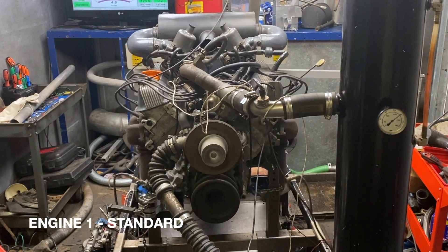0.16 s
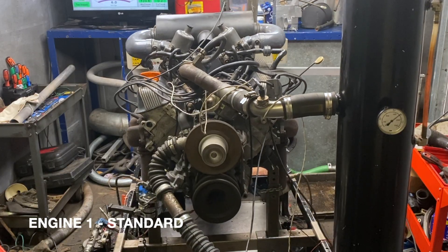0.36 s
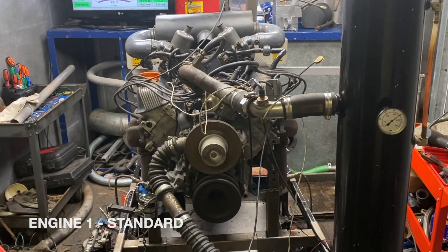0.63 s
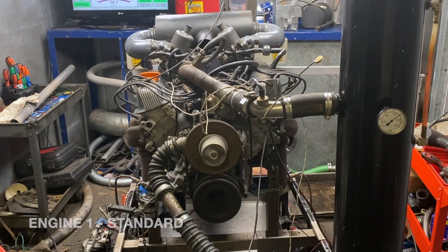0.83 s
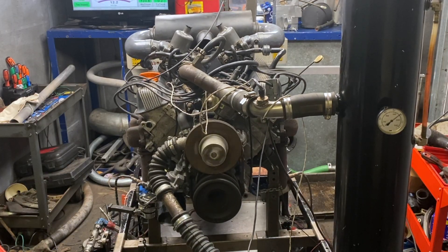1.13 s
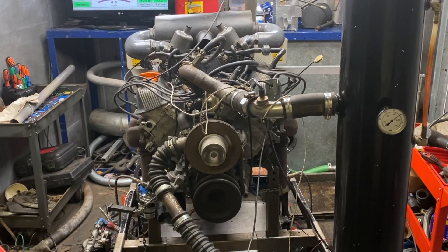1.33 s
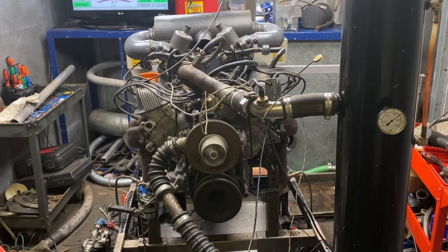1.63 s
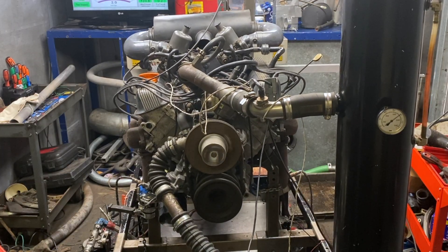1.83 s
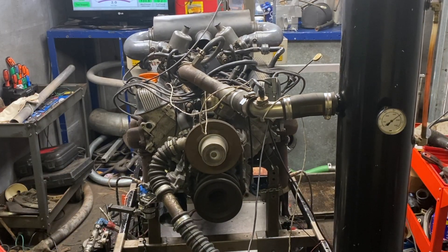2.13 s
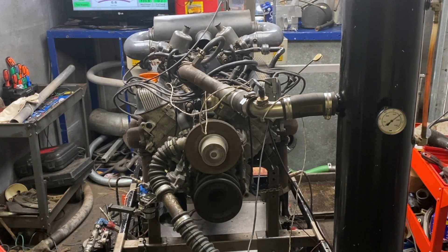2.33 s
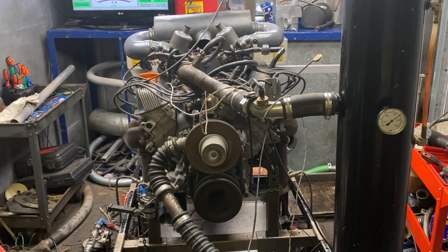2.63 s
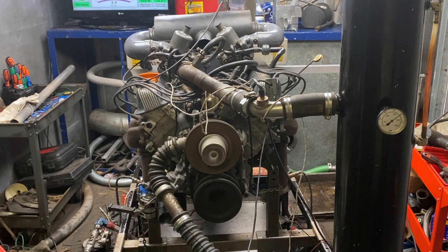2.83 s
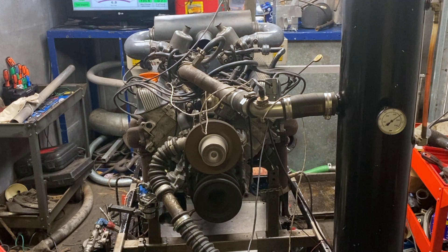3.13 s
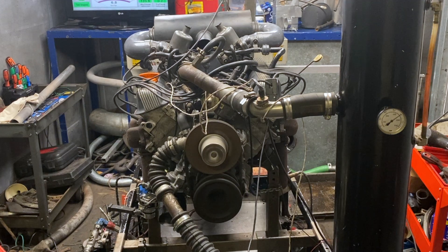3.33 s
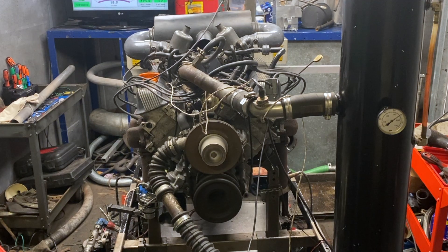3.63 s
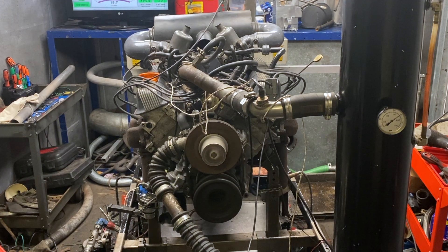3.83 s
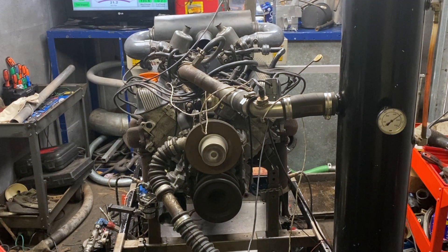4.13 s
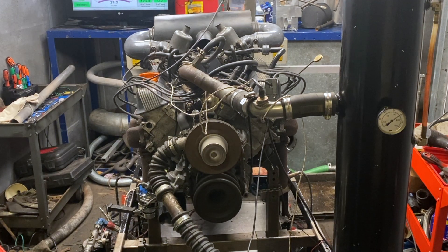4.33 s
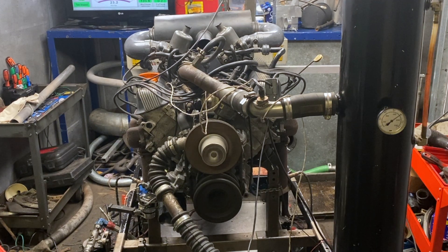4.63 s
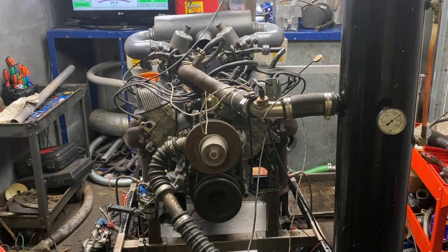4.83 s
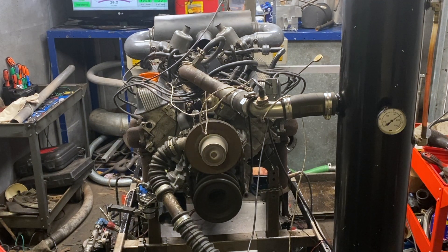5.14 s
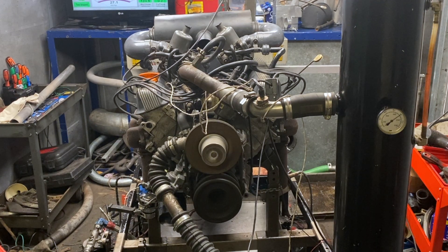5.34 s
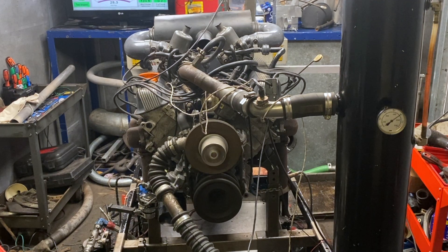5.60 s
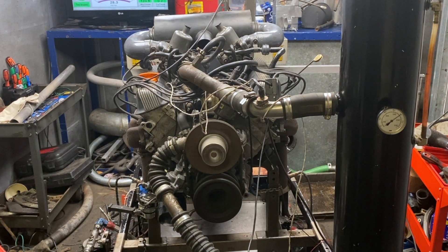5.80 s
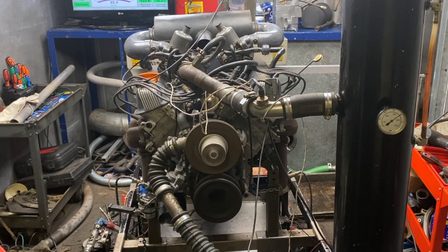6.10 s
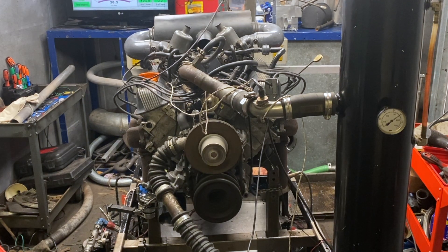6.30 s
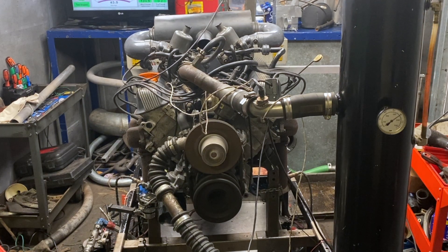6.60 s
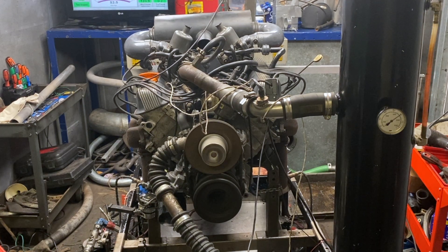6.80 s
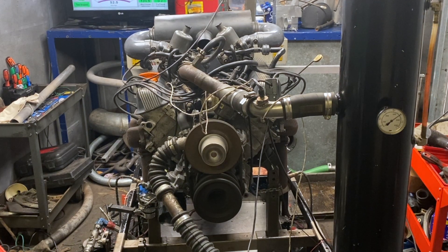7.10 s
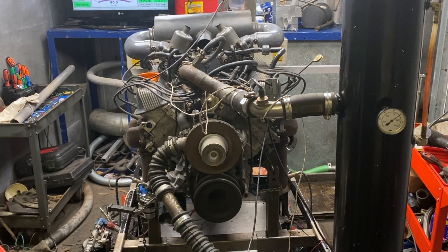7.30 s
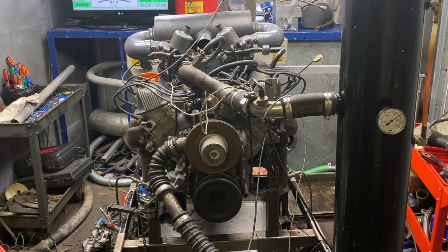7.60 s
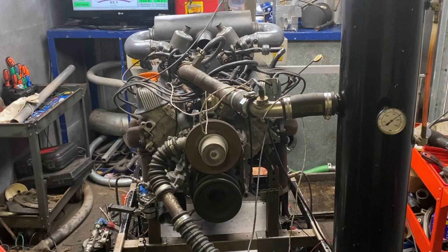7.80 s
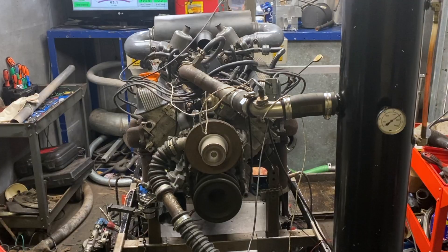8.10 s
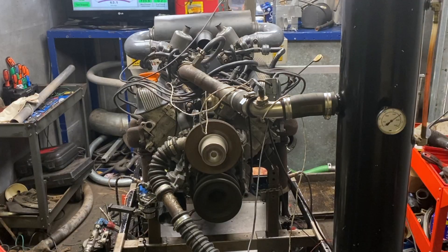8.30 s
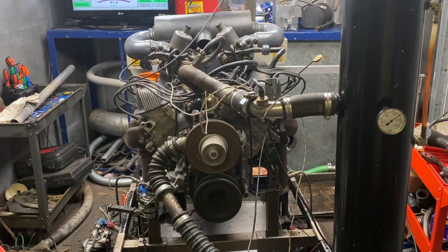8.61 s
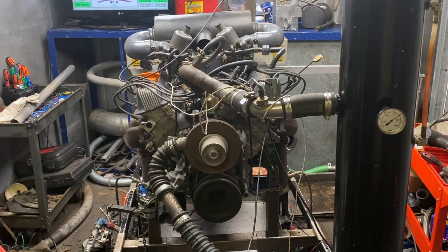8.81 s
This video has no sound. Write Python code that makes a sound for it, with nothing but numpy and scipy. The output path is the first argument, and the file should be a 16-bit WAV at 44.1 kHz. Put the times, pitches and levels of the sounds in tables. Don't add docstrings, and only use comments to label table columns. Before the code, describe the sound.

V8 on a test stand: revs fall to a slow stumbling idle, then surge into a sustained throaty roar that sags and wavers under load.

```python
import sys
import numpy as np
from scipy import signal
from scipy.fft import rfft, irfft, next_fast_len
from scipy.io import wavfile
from scipy.ndimage import uniform_filter1d

SR = 44100
rng = np.random.default_rng(int(sys.argv[2]) if len(sys.argv) > 2 else 0)


def to_wav(s):
    ch = np.atleast_2d(s).T
    pcm = np.round(np.clip(ch, -1, 1) * 32767)
    wavfile.write(sys.argv[1], SR, pcm.astype(np.int16))


def how_loud(loudness_db):
    steps = np.asarray(loudness_db, float) / 20
    return 10 ** steps


N = 394694
FFT_N = next_fast_len(N)
T = np.arange(N) / SR
F = np.fft.rfftfreq(FFT_N, 1 / SR)

# time in seconds, four-stroke cycles per second in Hz.
SPEED = [(0, 21.3), (.12, 21.2), (.45, 14.4), (.9, 8.8), (1.2, 6.95), (1.72, 6.25), (2.2, 13.35),
         (2.55, 16.25), (2.8, 17.0), (3.2, 16.95), (4.2, 15.93), (5.2, 15.33), (5.75, 15.65), (6.2, 16.78),
         (6.7, 15.37), (7.25, 14.58), (8.1, 13.83), (8.95, 14.27)]
# time in seconds, gas flow in dB, exhaust push in dB, brake load 0-1.
DRIVE = [(0, 6, -13, 0), (.08, 1.5, -9, 0.15), (.16, -2, -11, 0), (.4, -4.5, -17, 0), (.65, -8, -18, 0),
         (.8, -13, -11, 0), (1.1, -15.5, -7.5, 0), (1.3, -14, -3, 0), (1.64, -13, -0.5, 0.3),
         (1.84, -3, 0, 0.25), (1.95, -1.5, -0.5, 0.02), (2.45, -1.5, 1, 0.05), (3.7, -.5, 0.3, 0),
         (4.5, 1, 0, 0.24), (5.9, 0, -2.7, 0.84), (6.75, 0.5, -2.7, .95), (6.9, -1, -2.4, 0.93),
         (8.95, -1.87, -1.6, 1)]
# level in dB, dB per dB of flow, of speed, of push,
# dB added at full brake load, level that always stays in dB.
FOLLOW = [
    (-26, 0.62, 1.12, 0.3, 2.5, -37.5),
    (-28.5, 0.43, 1.46, 0.23, -1.5, -43.5),
    (-33, 1.34, -0.29, .02, 1, -52),
    (-26.5, .6, 1.5, .15, -8.5, -28.5),
    (-23.5, 1.2, -0.59, .02, -9.5, -32.5),
]

LEAD = (3, 4, 5, 8, 12, 16, 24)
# dB running free, dB under full brake load.
LEAD_DB = [(-32, -35), (-34, -27.5), (-22, -28), (-12, -11.5), (-38, -32.5), (-32.5, -38.5), (-39.5, -34)]
# centre in Hz, width in Hz, level in dB.
STANDING = [(53.3, 8.1, -0.3), (83.8, 15.7, 2.8), (106.7, 8.1, -9.5), (126, 24, -6), (222.5, 30, 1.5),
            (270.2, 9.8, 10), (353.6, 7.9, 7), (371.7, 10.3, 11), (389, 35, 13)]
# centre in Hz, width in Hz.
NULLS = [(134.5, 30), (405, 33)]

# multiple of the cycle, level in dB.
LOPE = [(1, -45), (2, -41), (6, -1), (7, -23), (9, -18), (10, -21.5), (11, -18), (13, -51), (14, -62),
        (15, -8), (17, -15), (18, -50), (19, -20), (20, -11.5), (21, -27), (22, -25), (23, -14), (25, -11),
        (26, -31), (27, -7.5), (29, -51), (30, -19), (31, -40), (33, -24), (34, -29), (35, -40)]
# multiple of the cycle, level in dB.
PULL = [(1, -46), (2, -27), (6, -21), (7, -13), (9, -14), (10, -20), (11, -18), (13, -23), (14, -32),
        (15, -21), (17, -19.5), (18, -11.5), (19, -17.5), (20, -18.5), (21, -14), (22, -27), (23, -18.5),
        (25, -17.5), (26, -23), (27, -52), (29, -38), (30, -23), (31, -17), (33, -35), (34, -27.5),
        (35, -35)]
# time in seconds, share of hard pull 0-1.
EASING = [(0, 0.7), (1, 0.69), (2.6, 1), (4.5, 0.66), (7, 0.15)]
# centre in Hz, width in Hz, level in dB.
CELL = [(50.8, 8.2, 9), (87, 4.6, 3.5), (119, 26.5, -2.5), (154.6, 42, -18.5), (264.3, 25, -3.5),
        (347, 58, -3), (391, 51, -6), (536, 62, -3)]

HIGH = (28, 32, 40, 44, 48, 56, 58, 62, 64, 76, 84, 96, 100)
# middle in seconds, length in seconds, level in dB.
SING = [(2.234, 0.22, -39), (2.57, .4, -39), (3.2, 0.41, -36.5), (3.604, 0.88, -33), (4.3, 1.1, -49),
        (4.4, 1.5, -40), (4.75, 0.71, -37), (5.0, 1.64, -36.5), (5.86, 0.24, -30), (6.3, 0.65, -48),
        (6.4, .9, -38), (6.5, 0.42, -37), (6.5, 0.64, -34.5), (6.56, 0.92, -30), (6.7, 0.6, -38),
        (7.45, 0.91, -29.5), (7.9, 1.3, -54), (8.2, 2.5, -40.5), (8.3, 2.1, -39), (8.45, 2.9, -36.5),
        (8.704, 1.8, -34), (8.95, 0.85, -30), (5.1, 1.9, -40), (5.5, 1.3, -36.5), (7.35, .8, -36),
        (7.9, 1.3, -45), (8.25, 0.76, -34.5), (5.85, 0.37, -30), (6.45, 0.25, -29.5), (7.4, 1.1, -36.5)]
SINGER = (40, 32, 44, 32, 84, 58, 48, 32, 84, 64, 48, 32, 56, 40, 44, 48, 58, 44, 40, 64, 84, 48, 28, 76,
          96, 62, 100, 16, 16, 16)
# middle in seconds, length in seconds, level in dB.
STUMBLE = [(.08, .15, -21), (0.15, 0.27, -32), (0.204, 0.22, -18), (.4, 0.2, -24), (0.53, 0.16, -18),
           (.54, 0.19, -27), (0.71, .12, -19), (.82, 0.12, -24), (1.5, .35, -28), (.08, 0.17, -27.5),
           (.09, .16, -34)]
STUMBLER = (5, 24, 3, 8, 6, 4, 5, 8, 12, 12, 16)
# middle in seconds, level in dB.
COUGHS = [(.03, -22.5), (.11, -29), (.27, -36), (.62, -40), (.8, -36), (1.0, -35), (1.13, -30), (1.3, -40),
          (1.55, -34), (1.72, -30.5)]
# centre in Hz, width in Hz, level in dB.
COUGH_PIPES = [(270, 60, 4.5), (1040, 520, -5)]

# Hz, dB per Hz.
ROAR = [(240, -41), (400, 3), (683, 4.5), (906, 4.5), (1050, 1.5), (1170, 0), (1260, 0.5), (1370, -1),
        (1800, -8), (2340, -62), (3960, -120)]
# centre in Hz, width in Hz, dB over the roar.
INTAKE = [(1197, 34, 9.5), (1303, 14, 1), (1390, 108, 12), (1403, 19, -6), (1490, 100, 3.5)]
# Hz, dB per Hz.
BLOCK = [(1030, -7.5), (1750, -2.5), (2240, -2.5), (2480, -2), (2890, -2), (3150, -4), (3400, -11.5),
         (4420, -17), (7480, -120)]
# centre in Hz, width in Hz, dB over the block.
RING = [(1937, 28, 3), (2265, 130, 6), (2400, 22, -14), (3060, 52, 0)]
# Hz, dB per Hz.
RUMBLE = [(18, -41), (30, -1.5), (98, -5.5), (142, -13), (189, -24), (242, -11.5), (319, -17), (355, -20),
          (425, -23), (520, -17), (680, -34), (1140, -120)]
# Hz, dB per Hz.
GEAR = [(3000, -8), (3400, -2), (4500, -0.5), (5700, -2.5), (6700, -1), (9000, -4), (11000, -4.5),
        (13000, -6.5), (15700, -15.5), (15900, -60)]
# centre in Hz, width in Hz, level in dB.
PUMPS = [(537, 33, -7), (740, 33, 2.5), (884, 66, 0.5), (1150, 88, -3), (2265, 60, -1.5), (3078, 59, -4)]

# Hz, side minus mid in dB.
WIDE = [(60, -29), (110, -3), (200, -17.5), (380, -5), (700, -0.5), (1290, -5), (2380, -7), (4400, -3.5),
        (8120, -4), (15000, -1)]
# Hz, left minus right in dB.
TILT = [(60, -1), (110, -2), (200, -.5), (380, -1.5), (700, 0), (2380, .5), (4400, 2), (8120, 0)]

PULL_HZ, LOPE_HZ = 16.9, 14.1
CRUISE_HZ = 16
FIRINGS = 8
TICK_S = 1.252
BLOW_S = 7.041


def level(x, db):
    return x * how_loud(db) / np.sqrt(np.mean(x ** 2))


def curves(table):
    s, *columns = np.transpose(table)
    return [np.interp(T, s, column) for column in columns]


def on_axis(points):
    hz, value = np.transpose(points)
    return np.interp(np.log(F + 1), np.log(hz + 1), value)


def modes(table, hz=F):
    gain = 0
    for k, (centre, width, db) in enumerate(table):
        damping = 1j * hz * width
        gain = gain + (-1) ** k * how_loud(db) * damping / (centre ** 2 - hz ** 2 + damping)
    return gain


def through(x, gain):
    return irfft(rfft(x, FFT_N) * gain, FFT_N)[:N]


def walk(rate):
    hold = int(SR / rate)
    steps = np.repeat(rng.standard_normal(N // hold + 1), hold)
    return 1.01 * uniform_filter1d(uniform_filter1d(steps, hold), hold)[:N]


def follow(law, flow_db, hz, push_db, load):
    db, per_flow, per_speed, per_push, loaded_db, rest_db = law
    speed_db = 20 * np.log10(hz / CRUISE_HZ)
    db = db + per_flow * flow_db + per_speed * speed_db + per_push * push_db + loaded_db * load
    return 10 * np.log10(how_loud(db) ** 2 + how_loud(rest_db) ** 2)


def in_step(orders):
    scatter = np.clip(0.07 * np.asarray(orders), 0, 3)
    return np.pi + scatter * rng.standard_normal(len(orders))


def tones(cycles, orders, lines_db):
    total = 0
    for k, db, phase in zip(orders, lines_db, in_step(orders)):
        total = total + np.sqrt(2) * how_loud(db + walk(9)) * np.cos(2 * np.pi * k * cycles + phase)
    return total


def replay(stored, cycles):
    place = np.arange(len(stored) + 1) / len(stored)
    return np.interp(cycles % 1, place, np.append(stored, stored[0]))


def noisy(cycles, repeat):
    again = replay(rng.standard_normal(size=3000), cycles)
    return np.sqrt(repeat) * again + np.sqrt(1 - repeat) * rng.standard_normal(N)


def exhaust(cycles, push_db, load):
    gain = np.sqrt(sum(np.abs(modes([wave])) ** 2 for wave in STANDING))
    null = np.prod([np.abs(1 - modes([(hz, width, 0)])) for hz, width in NULLS], axis=0)
    lines_db = [push_db + free + (held - free) * load for free, held in LEAD_DB]
    lead = through(tones(cycles, LEAD, lines_db), gain)
    load = np.clip(load, 0, 1)
    return load * lead + (1 - load) * through(lead, null)


def one_cycle(orders, hz, phase):
    k, db = np.transpose(orders)
    lines = np.zeros(2049, complex)
    unclaimed = ~np.isin(k, list(LEAD) + list(HIGH))
    lines[k.astype(int)] = how_loud(db) * phase / np.abs(modes(CELL, k * hz)) ** 0.57 * unclaimed
    return level(irfft(lines), 0)


def lope(cycles, db):
    phase = np.exp(1j * in_step(np.transpose(LOPE)[0]))
    pull = np.clip(curves(EASING)[0], 0, 1)
    hard = replay(one_cycle(PULL, PULL_HZ, phase), cycles)
    eased = replay(one_cycle(LOPE, LOPE_HZ, phase), cycles)
    beat = pull * hard + (1 - pull) * eased
    return level(through(beat * how_loud(0.71 * walk(15)), np.abs(modes(CELL))), db)


def swells(cycles, multiples, table, rest):
    size = {k: rest + 1e-9 for k in multiples}
    for k, (s, length, db) in zip(multiples, table):
        size[k] = size[k] + how_loud(db) * np.exp(-(2 * (T - s) / length) ** 2)
    return tones(cycles, list(size), [20 * np.log10(v) for v in size.values()])


def singing(cycles):
    rest = how_loud(-53.5) * (T > SING[0][0])
    return swells(cycles, SINGER, SING, rest) + swells(cycles, STUMBLER, STUMBLE, 0)


def coughs():
    half_length = 0.05
    size = sum(how_loud(db) * np.exp(-((T - s) / half_length) ** 2) for s, db in COUGHS)
    return size * level(through(rng.standard_normal(N), modes(COUGH_PIPES)), 0)


def roar(cycles, db):
    puff = 1 + 0.15 * np.cos(2 * np.pi * FIRINGS * cycles)
    gas = through(noisy(cycles, repeat=0.25) * puff, how_loud(on_axis(ROAR)))
    ring = sum(through(gas, modes([pipe])) * how_loud(2.6 * walk(7)) for pipe in INTAKE)
    build = 1 / (0.5 * SR)
    slow_db = signal.lfilter([build], [1, build - 1], db + 30)
    flow = np.clip(how_loud(1.6 * (slow_db - 6.5)), 0, 1.2)
    return level(gas + ring * flow, db)


def block(cycles, gate, db):
    gain = how_loud(on_axis(BLOCK)) * (1 + np.abs(modes(RING)))
    knock = noisy(cycles, repeat=0.35) * gate ** 0.5
    return level(through(knock, gain) * how_loud(1.1 * walk(13)), db)


def rumble(cycles, db):
    return level(through(noisy(cycles, repeat=0.5), how_loud(on_axis(RUMBLE))) * how_loud(0.8 * walk(6)), db)


def ticks(cycles, hz, db):
    turn = 2 * (cycles - cycles[int(TICK_S * SR)]) + 100
    size = how_loud(db + 0.52 * rng.standard_normal(size=400))[turn.astype(int)]
    since_tick = (turn % 1) / (2 * hz)
    return 1 + size * (7 / hz) ** 2 * np.exp(-since_tick / 0.006)


def gear(gate, db):
    hiss = rng.standard_normal(N) * gate * how_loud(0.45 * walk(30) + 0.9 * walk(7))
    return level(through(hiss, how_loud(on_axis(GEAR))), db + 3.0)


def fan(gate, hz):
    hum = np.sqrt(2) * how_loud(-40 + 3.5 * walk(8.1)) * np.sin(2 * np.pi * 151.4 * T)
    pumps = level(through(rng.standard_normal(N), modes(PUMPS)) * how_loud(2.4 * walk(4)), -38.5)
    air_gain = modes([(10500, 5000, 0)]) ** 2 * (F < GEAR[-1][0])
    air = through(rng.standard_normal(N) * gate * how_loud(1.2 * walk(9)), air_gain)
    air_db = -43 + 0.55 * 20 * np.log10(hz / CRUISE_HZ)
    return hum + pumps + level(air, air_db)


def echoes(t60, hz):
    tail = rfft(rng.standard_normal(N) * np.exp(-np.log(1000) * T / t60), FFT_N)
    return tail / np.sqrt(np.mean(np.abs(tail) ** 2)) / np.sqrt(1 + (F / hz) ** 24)


def ports(lines, rest):
    lines, rest = rfft(lines, FFT_N), rfft(rest, FFT_N)
    mid = lines + rest * (1 + how_loud(-10) * echoes(t60=0.15, hz=6050))
    side = (lines * how_loud(-12.5) + rest) * how_loud(on_axis(WIDE)) * echoes(t60=0.8, hz=6700)
    slip = np.exp(1j * np.pi * np.clip(F - 7036, 0, None) / 4090)
    tilt = how_loud(on_axis(TILT) / 2)
    left, right = (mid / slip + side) * tilt, (mid * slip - side) / tilt
    return irfft(np.array([left, right]), FFT_N)[:, :N]


def scene():
    hz = uniform_filter1d(curves(SPEED)[0], size=6500)
    flow_db, push_db, load = curves(DRIVE)
    levels = [follow(law, flow_db, hz, push_db, load) for law in FOLLOW]
    roar_db, block_db, gear_db, lope_db, rumble_db = levels
    cycles = np.cumsum(hz) / SR
    cycles = cycles - cycles[int(BLOW_S * SR)]
    gate = ticks(cycles, hz, db=4.5)
    lines = exhaust(cycles, push_db, load) + singing(cycles)
    rest = lope(cycles, lope_db) + coughs() + roar(cycles, roar_db)
    rest = rest + block(cycles, gate, block_db) + rumble(cycles, rumble_db)
    rest = rest + gear(gate, gear_db) + fan(gate, hz)
    return ports(lines, rest)


def top_cut(x):
    return signal.sosfilt(signal.butter(12, 16610, fs=SR, output="sos"), x)


def record(dry):
    dry = signal.sosfilt(signal.butter(6, 39, "high", fs=SR, output="sos"), dry)
    return top_cut(np.tanh(1.085 * dry) / 1.072)


dry = scene()
out = record(dry)
to_wav(out)
```